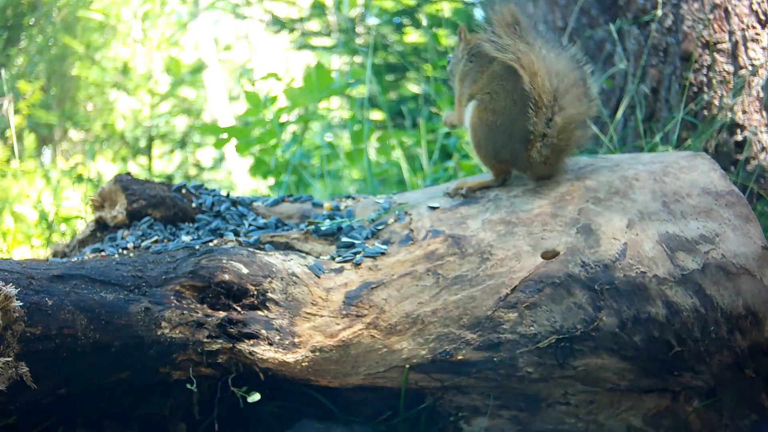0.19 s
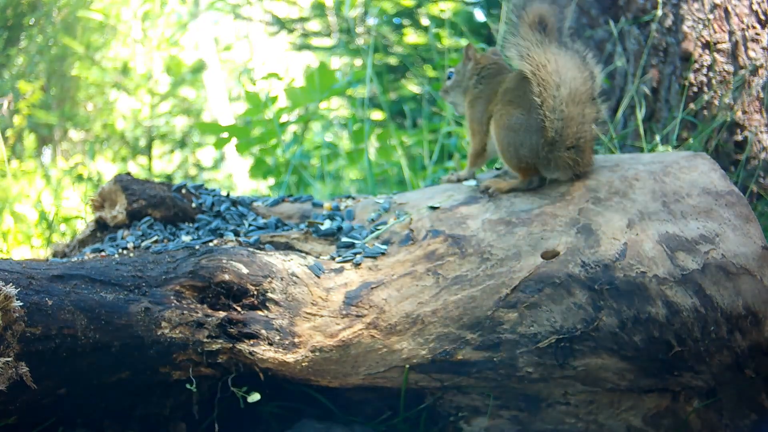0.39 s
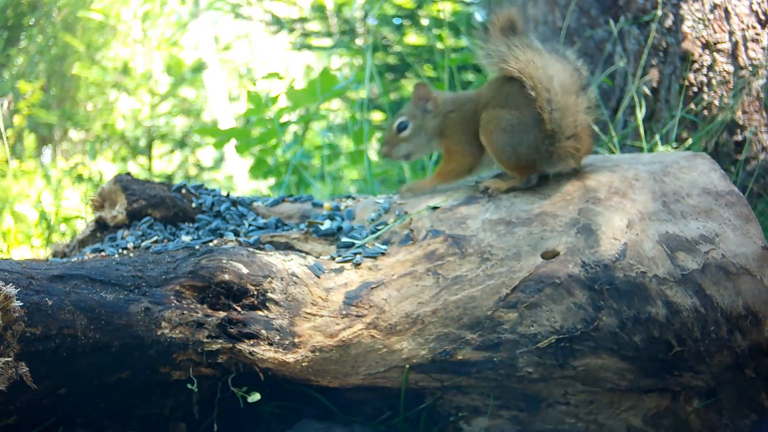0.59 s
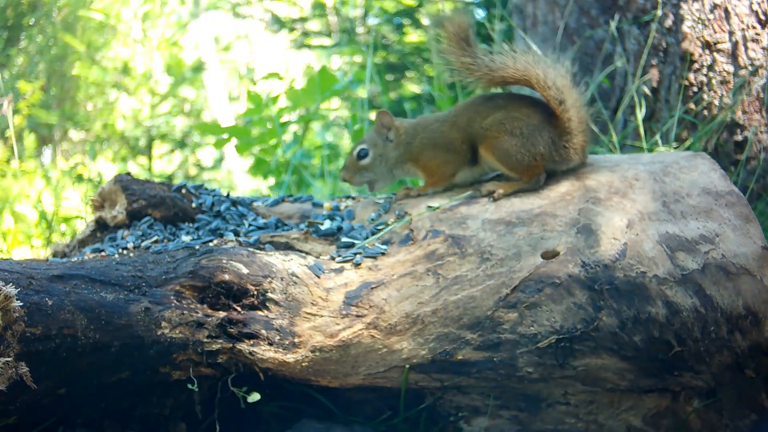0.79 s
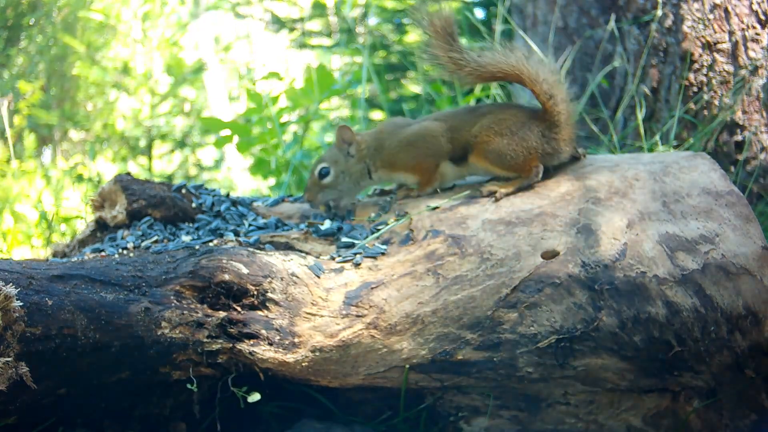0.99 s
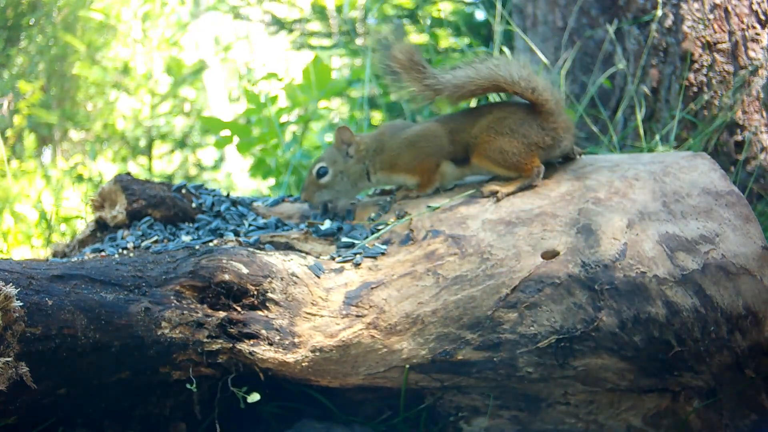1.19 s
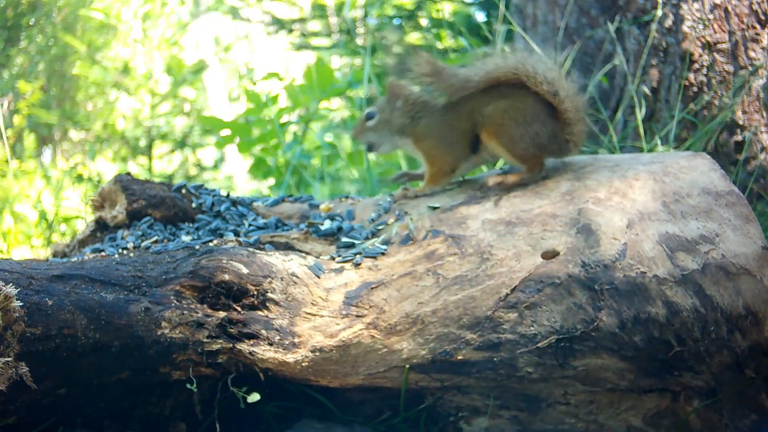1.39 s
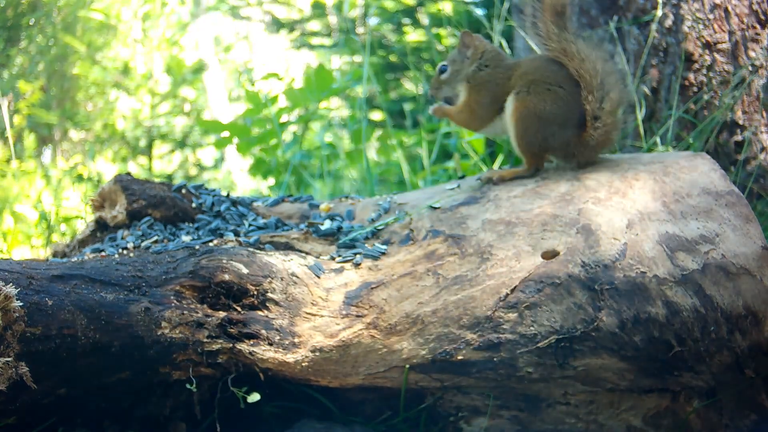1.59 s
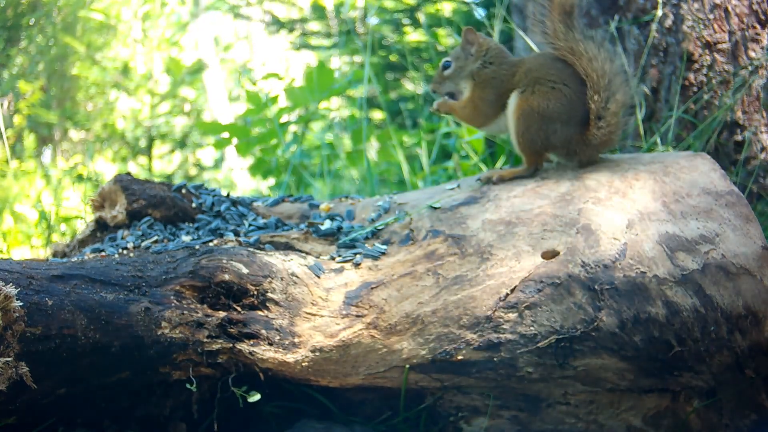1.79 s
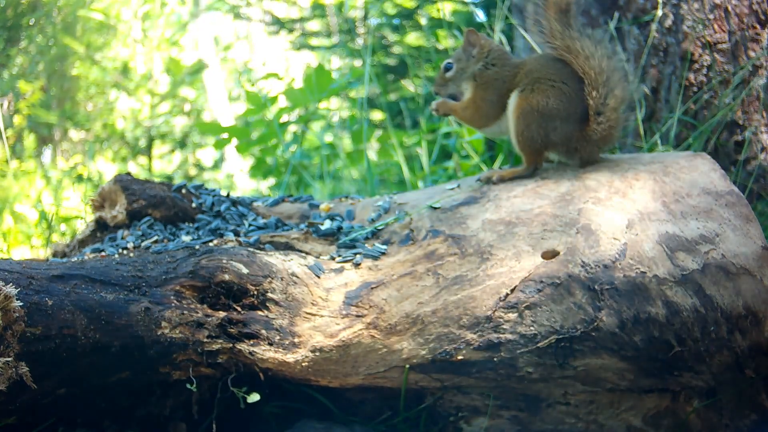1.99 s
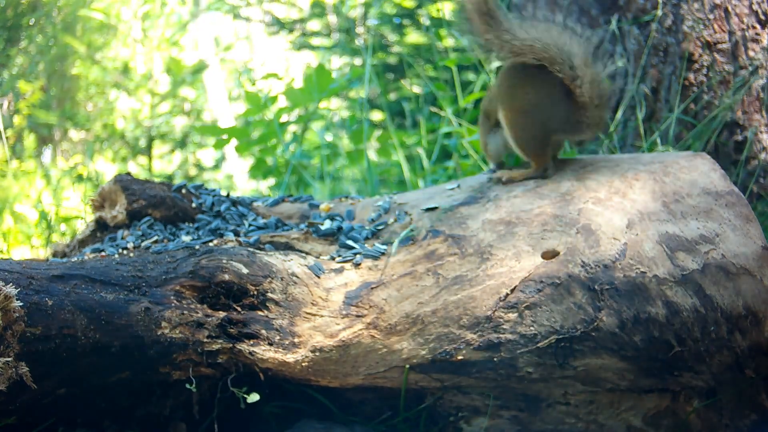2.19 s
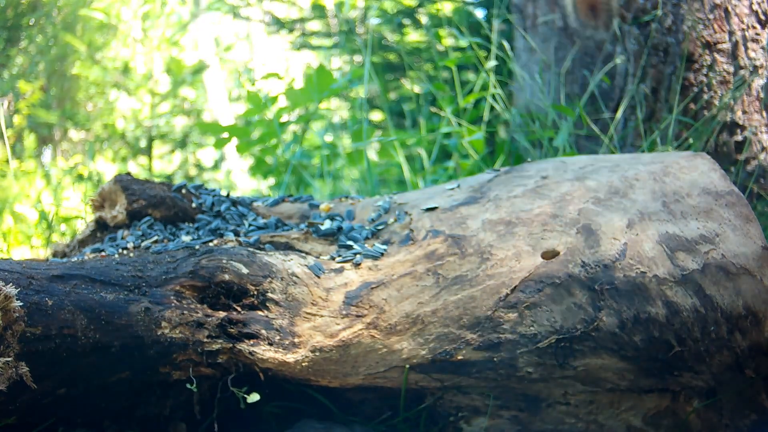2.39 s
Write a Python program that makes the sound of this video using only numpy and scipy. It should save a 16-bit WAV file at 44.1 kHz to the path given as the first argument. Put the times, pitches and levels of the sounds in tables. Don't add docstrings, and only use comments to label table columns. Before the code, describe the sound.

A crow very close to a small microphone caws harshly three times, first clear, then rattling, and begins a fourth cut short; a faint young crow begs between, with tiny peeps and claw ticks near the end.

```python
import sys
import numpy as np
from scipy import signal
from scipy.fft import rfft, irfft, next_fast_len
from scipy.io import wavfile
from scipy.ndimage import uniform_filter1d

SR = 44100
rng = np.random.default_rng(int(sys.argv[2]) if len(sys.argv) > 2 else 0)


def gain_from_db(level_db):
    decades = np.asarray(level_db, float) / 20
    return 10 ** decades


def digitize_waveform(pressure):
    field = np.atleast_2d(pressure).T
    bounded = np.clip(field, -1, 1)
    quanta = np.round(bounded * 32767).astype(np.int16)
    wavfile.write(sys.argv[1], SR, quanta)


N = 112455
T = np.arange(N) / SR


def drift(rate_hz):
    r = np.exp(-2 * np.pi * rate_hz / SR)
    settle = 9000
    slow = signal.lfilter([1], [1, -2 * r, r * r], rng.standard_normal(N + settle))[settle:]
    return slow / slow.std()


def resonate(x, hz, width_hz):
    r = np.exp(-np.pi * width_hz / SR)
    poles = [1, -2 * r * np.cos(2 * np.pi * hz / SR), r * r]
    return signal.lfilter([(1 - r * r) / 2, 0, (r * r - 1) / 2], poles, x)


def gate(start_s, end_s, edge_s):
    return np.clip(np.minimum(T - start_s, end_s - T) / edge_s, 0, 1)


# hz, density_db [dB per Hz]
YARD_AIR = [(30, -26), (86, -13), (150, -19), (250, -32), (500, -17), (1500, -6), (3500, -14), (15000, -50)]


def air():
    f = np.maximum(np.arange(N // 2 + 1) * SR / N, 20)
    hz, db = np.transpose(YARD_AIR)
    spectrum = rfft(rng.standard_normal(N)) * gain_from_db(np.interp(np.log(f), np.log(hz), db))
    noise = irfft(spectrum, N)
    level_db = -57.5 + 1.2 * drift(18.0)
    return gain_from_db(level_db) * noise / noise.std()


def trees(x):
    t60_s, level_db, band_hz = 0.44, -18.5, [1500, 7100]
    t = T[:SR]
    tail = rng.standard_normal(SR) * gain_from_db(-60 * t / t60_s) * np.clip(t / 0.0067, 0, 1)
    tail = signal.sosfilt(signal.butter(1, band_hz, "band", fs=SR, output="sos"), tail)
    tail = tail / np.sqrt(np.sum(tail ** 2))
    return gain_from_db(level_db) * signal.fftconvolve(x, tail)[:N]


# hz, width_hz, level_db
THROAT_RESONANCES = [(640, 900, -15.5), (1338.6, 117.8, 4), (1660, 151, 2), (2180, 67, -14),
                     (3098, 137, -16), (4240, 1500, -22), (4970, 160, -20.5), (6055, 1040, -36.5),
                     (7780, 370, -37), (9900, 2600, -67)]
# hz, width_hz, share [0-1]
SIDE_BRANCHES = [(1880, 79, 0.5), (2356, 79, 1), (3864, 900, 0.78), (5680, 870, 0.8)]


def throat(x):
    out = 0
    for k, (hz, width_hz, db) in enumerate(THROAT_RESONANCES):
        out = out + (-1) ** k * gain_from_db(db) * resonate(x, hz, width_hz)
    for hz, width_hz, share in SIDE_BRANCHES:
        out = out - share * resonate(out, hz, width_hz)
    out = signal.sosfilt(signal.butter(6, 9000, fs=SR, output="sos"), out)
    return signal.sosfilt(signal.butter(4, 460, "high", fs=SR, output="sos"), out)


# start_s, pitch_hz, level_db
BEG_FALLING = [
    (0.791, 719, -51),
    (0.862, 706, -56),
    (0.902, 681, -45.5),
    (0.942, 653, -52.5),
    (.975, 622, -42.5),
]
BEG_RISING = [
    (.975, 616, -44),
    (1.001, 678, -43),
    (1.02, 710, -32.5),
    (1.045, 774, -30.5),
    (1.076, 692, -31.5),
]
# level_db, from the fundamental up
BEG_HARMONICS = [
    [-24, -3, 0, -12, -11, -34, -34, -36],
    [-20, 0, -22, -22, -40, -42, -38, -38],
]
BEG_RASP = [-14, 8]


def begging():
    out = 0
    rasp = throat(rng.standard_normal(N))
    rasp = rasp / rasp.std()
    for rows, levels_db, rasp_db in zip((BEG_FALLING, BEG_RISING), BEG_HARMONICS, BEG_RASP):
        s, hz, db = np.transpose(rows)
        pitch = np.interp(T, s, hz) * (1 + 0.0068 * drift(42.0))
        turn = 2 * np.pi * np.cumsum(pitch) / SR
        tone = 0
        for k, level_db in enumerate(levels_db, 1):
            tone = tone + gain_from_db(level_db + 0.83 * drift(19.4)) * np.sin(k * turn)
        rough = gain_from_db(rasp_db) * rasp * np.exp(-np.abs(T - s[0]) / 0.023)
        out = out + (tone + rough) * gain_from_db(np.interp(T, s, db)) * gate(s[0], s[-1], 0.015)
    return out


# start_s, length_s, start_hz, end_hz, level_db
BIRD_NOTES = [
    (2.36, .03, 2600, 2750, -60),
    (2.46, .02, 4900, 4300, -58),
    (2.468, .02, 3000, 3900, -64),
    (2.496, .018, 2550, 2900, -59),
]


def chirps():
    out = 0
    for start_s, length_s, start_hz, end_hz, db in BIRD_NOTES:
        t = T - start_s
        cycles = start_hz * t + (end_hz - start_hz) * t ** 2 / (2 * length_s)
        out = out + gain_from_db(db) * np.sin(2 * np.pi * cycles) * gate(start_s, start_s + length_s, 0.0028)
    return out


# start_s, peak_db, centre_hz
CLAW_TICKS = [
    (2.3655, -56, 1500),
    (2.4765, -33, 2400),
    (2.4854, -48, 1580),
    (2.4887, -37, 2690),
    (2.5074, -42, 2880),
    (2.5132, -39, 2720),
    (2.522, -27.5, 2810),
    (2.528, -42, 2180),
    (2.532, -36, 1660),
]


def claws():
    out = 0
    for start_s, peak_db, centre_hz in CLAW_TICKS:
        burst = rng.standard_normal(N) * (T > start_s) * np.exp(-np.abs(T - start_s) / 0.0028)
        out = out + gain_from_db(peak_db - 7.5) * resonate(burst, centre_hz, 3330.0)
    return out


# start_s, peak_db
VALVE_SNAPS = [
    (0.213, -2.5),
    (1.06, -0.5),
    (1.85, -3.5),
    (2.543, -0.5),
]


def snaps():
    clicks = np.zeros(N) + 1e-18
    for start_s, peak_db in VALVE_SNAPS:
        clicks[int(start_s * SR)] = gain_from_db(peak_db + 9)
    return throat(clicks)


def caw(rows, flutter_hz, jitter, breath_db, tilt_db):
    s = np.array(rows)[:, 0]
    hz, db, half_db, depth = [np.interp(T, s, column) for column in np.transpose(rows)[1:]]
    flutter_rate = flutter_hz * (1 + 0.02465 * drift(5.05))
    flutter = np.sin(2 * np.pi * np.cumsum(flutter_rate) / SR)
    hz = uniform_filter1d(hz, size=900) * (1 + 0.065 * depth * flutter + jitter * drift(136.0))
    turn = np.pi * np.cumsum(hz) / SR
    breath = 8 * rng.standard_normal(N) * (1 + np.cos(2 * turn))
    voice = throat(gain_from_db(breath_db) * breath)
    size = 8192
    colour = rfft(throat(1.0 * (np.arange(size) == 0)))
    waver = drift(6.7)
    on = slice(int(s[0] * SR) - 900, int(s[-1] * SR) + 900)
    for k in range(1, 60):
        f = k * hz[on] / 2
        line_db = tilt_db * f / 1000 + 1.5 * np.roll(waver, 1700 * k)[on]
        if k % 2:
            line_db = line_db + half_db[on]
        gain = np.interp(f * size / SR, np.arange(size // 2 + 1), colour) * gain_from_db(line_db) * (f < 15000)
        voice[on] += np.real(gain * np.exp(1j * k * turn[on]))
    voice = voice / np.sqrt(uniform_filter1d(voice ** 2, size=330))
    voice = voice * (1 + 0.4 * depth * flutter)
    return voice * gain_from_db(db) * gate(s[0], s[-1], 0.0034)


# start_s, pitch_hz, level_db, half_pitch_db, flutter_depth [0-1]
CLEAR_CAW = [
    (0.22, 480, -21, 4, 0),
    (0.243, 614, -18, 2.5, 0.1),
    (0.274, 666.8, -13, -2.5, 0.06),
    (0.348, 657.3, -13, 0.5, 0.09),
    (0.418, 621.4, -17, 1, 0),
    (0.522, 614.6, -19, 1.5, 0.09),
    (0.609, 552.6, -17, -5.5, 0.05),
    (.69, 524.3, -20, -21, 0.09),
    (0.751, 404, -31, -11, 0.1),
]
SECOND_CAW = [
    (1.064, 421.9, -23, -22, 0.82),
    (1.104, 588.1, -14.5, 1.5, 0.78),
    (1.13, 621.2, -17.5, -2, 0.47),
    (1.23, 557.3, -16.5, -12.5, 0.53),
    (1.308, 547.3, -15.5, -17, 0.59),
    (1.388, 505.6, -19.5, -17, 0.69),
    (1.6, 434.9, -19.5, -15.5, 0.38),
    (1.638, 367, -26, -17, 0.93),
    (1.66, 392, -55, 10, 0.98),
]
THIRD_CAW = [
    (1.859, 427.5, -20.5, -35, 0.52),
    (1.887, 564, -16, -12.5, 0.69),
    (1.921, 638.3, -17.5, -23, 0.9),
    (1.967, 603.6, -16.5, -4, 0.69),
    (2.109, 547.2, -15.5, -9.5, 0.64),
    (2.229, 473.5, -21, -14.5, 0.62),
    (2.263, 438.4, -20.5, -17, 0.9),
    (2.287, 347.2, -27.5, -7.5, 0.62),
    (2.31, 307, -37, -15, 0.18),
]
FOURTH_CAW = [
    (2.547, 440, -31, -15, 0.1),
    (2.56, 483, -1, -11, 0.22),
]
# flutter_hz, jitter [share of pitch], breath_db, tilt_db [dB per kHz]
CAW_VOICES = [
    (60, .0012, -38, .4),
    (58.5, .004, -21, -.2),
    (63, .0045, -20, -.2),
    (60, .004, -20, -.2),
]


def crow():
    caws = (CLEAR_CAW, SECOND_CAW, THIRD_CAW, FOURTH_CAW)
    return sum(caw(rows, *voice) for rows, voice in zip(caws, CAW_VOICES)) + snaps()


def scene():
    near = crow()
    far = begging()
    echoes = trees(near + gain_from_db(10.5) * far)
    return (air() + echoes + far + chirps() + claws() + near)[None]


def band_limit(x):
    return signal.sosfilt(signal.butter(12, 15730, fs=SR, output="sos"), x)


def record(dry):
    limit, limit_share, knee, squash = 0.45, 0.86, 0.23, 0.55
    swell = np.abs(signal.hilbert(dry, next_fast_len(N))[:, :N])
    swell = uniform_filter1d(swell, size=24)
    x = dry * np.minimum(limit / (swell + 1e-9), 1) ** limit_share
    x = x + squash * np.maximum(-x - knee, 0)
    x = signal.sosfilt(signal.cheby2(20, 70, 15800, fs=SR, output="sos"), x)
    return band_limit(x)


dry = scene()
out = record(dry)
digitize_waveform(out)
```